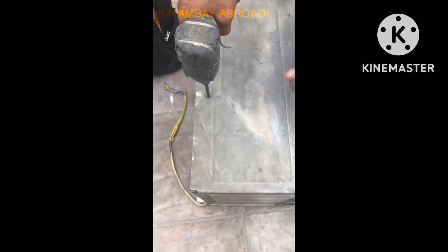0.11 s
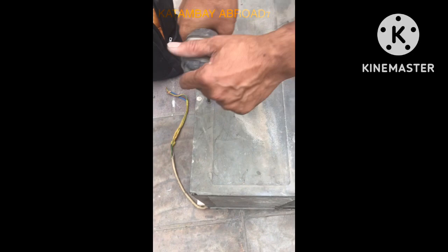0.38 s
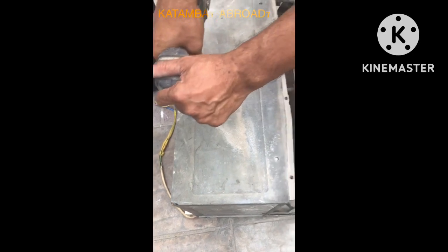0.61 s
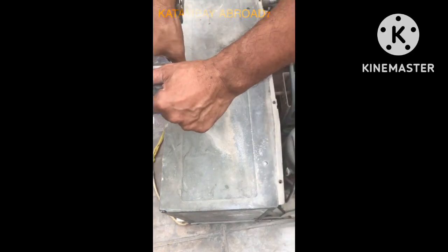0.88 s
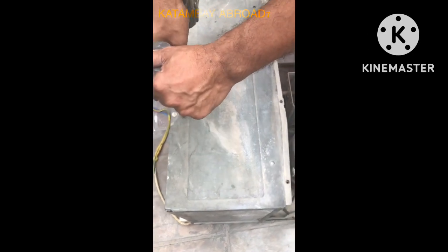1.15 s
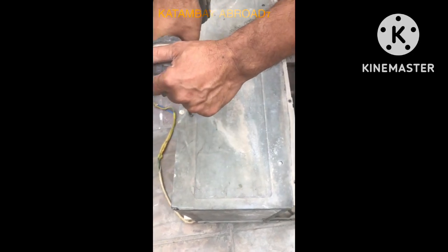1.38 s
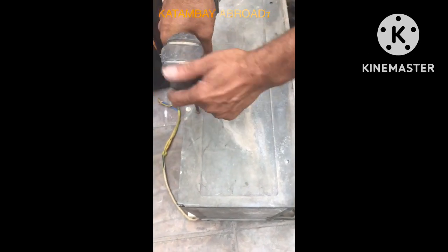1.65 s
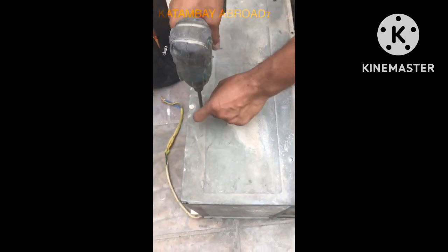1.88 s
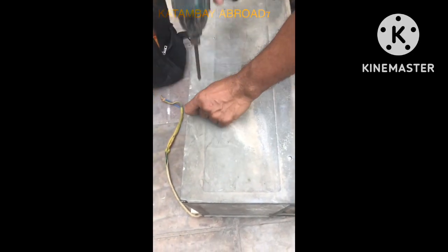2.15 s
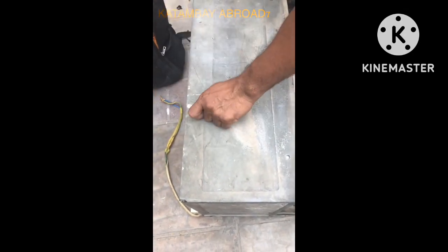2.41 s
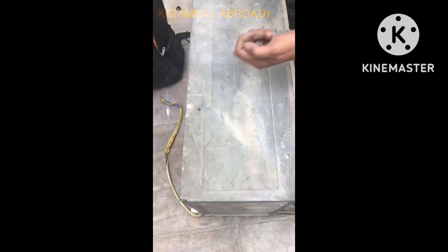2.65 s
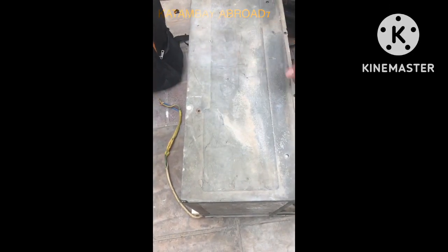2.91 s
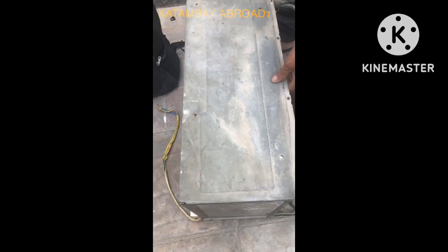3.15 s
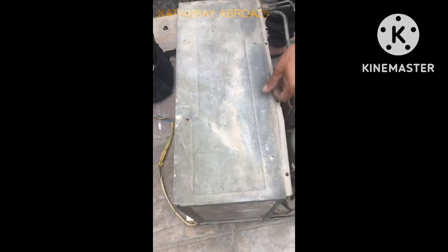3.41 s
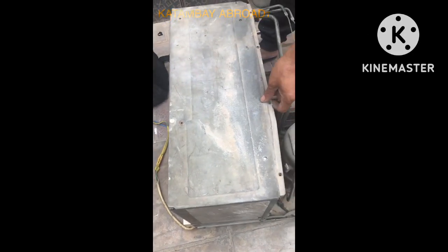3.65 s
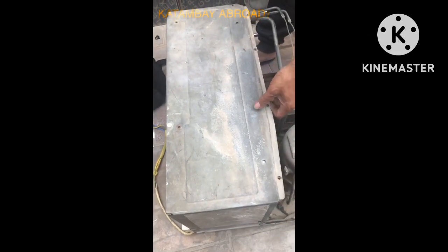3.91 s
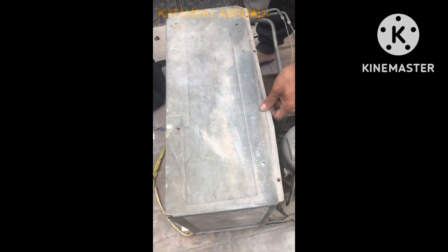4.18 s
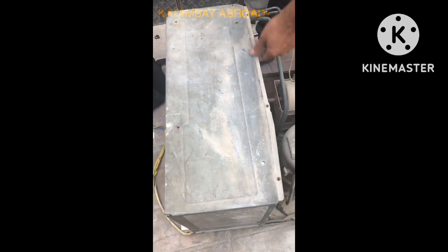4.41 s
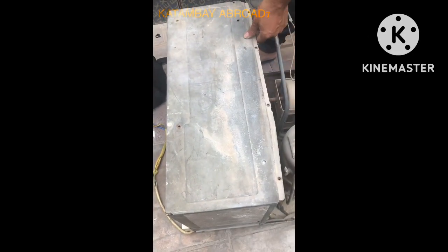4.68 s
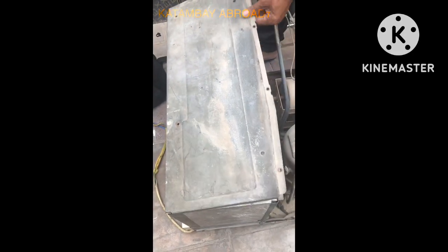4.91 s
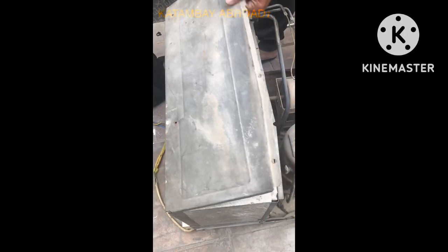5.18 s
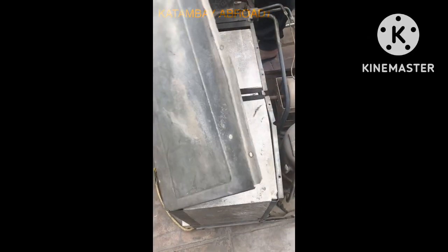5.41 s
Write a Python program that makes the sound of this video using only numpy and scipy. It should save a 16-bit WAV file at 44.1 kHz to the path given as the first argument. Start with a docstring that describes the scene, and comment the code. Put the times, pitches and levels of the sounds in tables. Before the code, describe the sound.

A cordless drill bites loudly into a screw, pauses, whirrs longer to unscrew it, then hands rub and tap a sheet-metal cover.

```python
"""Drill on a sheet-metal casing

A cordless drill bites into a screw, then runs again to unscrew it: the stick-slip judder booms in the panels,
while motor and gears whirr as coloured grit and swept tooth tones. Clicks of the drill body strike damped
modes, and a thin tone sings from the speed control. Hands rub, drag, tap and thump the cover as filtered
grains and modal blows, over an outdoor floor, a wavering hum and a rumble. Both channels carry the same sound.
"""
import sys
import numpy as np
from scipy import signal
from scipy.fft import rfft, irfft
from scipy.io import wavfile
from scipy.ndimage import uniform_filter1d

SR = 44100
rng = np.random.default_rng(int(sys.argv[2]) if len(sys.argv) > 2 else 0)


def to_wav(s):
    """Save 16-bit WAV."""
    ch = np.atleast_2d(s).T  # columns
    pcm = np.round(np.clip(ch, -1, 1) * 32767)  # PCM
    wavfile.write(sys.argv[1], SR, pcm.astype(np.int16))


def how_loud(loudness_db):
    """Turn decibels into a plain amplitude multiplier (0 dB gives 1, 20 dB gives 10)."""
    steps = np.asarray(loudness_db, float) / 20
    return 10 ** steps


N = 245047
T = np.arange(N) / SR


def level(x, db):
    """Energy normalisation: scale a signal to an rms level in dB."""
    return x * how_loud(db) / np.sqrt(np.mean(x ** 2))


def columns(table):
    """Linear interpolation: each column as a curve in time, with a gate open while the table lasts."""
    s, *cols = np.transpose(table)
    gate = uniform_filter1d(1. * ((T > s[0]) & (T < s[-1])), size=150)
    return gate, [np.interp(T, s, c) for c in cols]


def strokes(table, rise_db_per_s, fall_db_per_s, rest_db):
    """Exponential swell and decay: gain of gestures that rise, hold and fade, over a level at rest."""
    s, length, db = np.transpose(table)[:, :, None]
    rise = rise_db_per_s * np.maximum(s - T, 0)
    fall = fall_db_per_s * np.maximum(T - s - length, 0)
    return how_loud(rest_db) + how_loud(db - rise - fall).sum(axis=0)


def colour(x, points):
    """Minimum-phase filtering: a causal filter from (f/Hz, level/dB) points by way of the cepstrum."""
    hz, db = np.transpose(points)
    f = np.fft.rfftfreq(4096, 1 / SR)
    cep = irfft(np.log(how_loud(np.interp(np.log(f + 1), np.log(hz), db))))
    # folding the cepstrum onto positive time makes the response causal
    cep[1:2048] *= 2
    cep[2049:] = 0
    response = irfft(np.exp(rfft(cep)))
    return signal.fftconvolve(x, response)[:len(x)]


def band(x, hz, width):
    """Second-order resonance with gain 1 at its centre; width in Hz."""
    return signal.lfilter(*signal.iirpeak(min(hz, .45 * SR), hz / min(width, .45 * SR), SR), x)


def walk(rate):
    """Slow random modulation: levels held for 1 / rate s and slewed twice, with a spread near 1."""
    k = int(SR / rate)
    held = np.repeat(rng.standard_normal(N // k + 1), k)
    return 1.3 * uniform_filter1d(uniform_filter1d(held, k), k)[:N]


def grit(spread_db, size=N):
    """Contact of rough surfaces: dense tiny impacts of very uneven size."""
    return rng.standard_normal(size) * how_loud(spread_db * rng.exponential(size=size))


def ring(modes, t, centre_hz, favour_db):
    """Modal decay: clusters of twelve per mode, weakened by favour_db per octave off the centre; peak 1."""
    hz, db, t60 = np.repeat(np.transpose(modes), 12, axis=1)[:, :, None]
    luck = rng.standard_normal((2, len(hz), 1))
    db = db + 3 * luck[0] - favour_db * np.abs(np.log2(hz / centre_hz))
    spread_hz = hz * (1 + .07 * luck[1])
    y = (how_loud(db - 60 * t / t60) * np.sin(2 * np.pi * spread_hz * t)).sum(axis=0)
    return y / np.abs(y).max()


def blows(table, modes, ring_db, rise_s, linger, snap):
    """Forced modal vibration: each gritty scrape sounds by itself and keeps knocking the modes of the body."""
    out, t = np.zeros(N + SR), T[:SR // 4]
    for s, db, hz, decay, treble_db in table:
        # a linger above 1 holds the level before it dies
        fall = how_loud(-60 * (t / max(decay, .003)) ** linger)
        scrape = grit(2.0, size=len(t)) * fall * np.minimum(t / rise_s, 1)
        scrape = scrape * (1 + snap * np.exp(-t / 0.0031))
        body = band(band(scrape, hz, hz), hz, 2 * hz)
        treble = band(scrape, 7300, 12000)
        rung = signal.fftconvolve(scrape, ring(modes, t, hz, favour_db=6))[:len(t)]
        start = int(s * SR)
        for part, gain_db in ((body, 0), (treble, treble_db), (rung, ring_db)):
            out[start:start + len(t)] += how_loud(db + gain_db) * part / np.abs(part).max()
    return out[:N]


def yard():
    """Broadband noise and frequency modulation: a soft outdoor floor, a wavering hum and a deep rumble."""
    # spectrum of the floor: f/Hz, level/dB
    floor_colour = [(12, -25), (20, 5), (43, -8.5), (67, 12), (131, -10.5), (348, -3.5), (435, -39.5),
                    (954, -13), (1980, -26), (4980, -40), (6060, -58.5), (10300, -54), (12900, -36),
                    (16100, -43)]
    # the hum swells with the drill and the lifted cover: t/s, length/s, level/dB
    hum_swells = [(.6, 0.29, -40.5), (1.65, 0.064, -46.5), (4.98, .3, -48.5)]
    # the rumble swells with the drill and grows at the end: t/s, length/s, level/dB
    rumbles = [(.58, 0.034, -51), (5.1, 0.027, -48), (5.32, 0.26, -40)]
    fade_db_per_s = 122

    def deep_tone(hz):
        pitch = hz * (1 + .13 * walk(13))
        return level(how_loud(2.4 * walk(36)) * np.sin(2 * np.pi * np.cumsum(pitch) / SR), 0)

    hum = strokes(hum_swells, fade_db_per_s, fade_db_per_s, rest_db=-46) * deep_tone(57.2)
    rumble = strokes(rumbles, fade_db_per_s, fade_db_per_s, rest_db=-65.5) * deep_tone(37)
    floor = colour(rng.standard_normal(N), floor_colour) * how_loud(1.5 * walk(1.7))
    return level(floor, -50) + hum + rumble


def hands():
    """Sliding friction: skin rustles over the sheet in fine grains and drags it with a duller noise."""
    # spectra of rustle and drag: f/Hz, level/dB
    rustle_colour = [(410, -49), (700, -32), (747, -8.5), (985, -0.5), (1280, 0), (1900, -3), (3570, 3.5),
                     (4070, -1.5), (5800, -2), (12900, -4), (16100, -11.5)]
    drag_colour = [(53, -32), (90, 0), (201, 1), (317, -5), (385, -8), (568, -9), (638, -10.5),
                   (2000, -25.5), (2600, -30), (4400, -120)]
    # fingers rub the sheet: t/s, length/s, level/dB
    rubs = [(0, 0.034, -45), (.36, .03, -54.5), (1.2, 0.086, -52), (2.26, 0.053, -56), (2.45, 0.011, -54.5),
            (2.62, 0.094, -72), (3.13, 0.0094, -60.5), (3.26, .08, -47.5), (3.53, .06, -68.5),
            (3.65, 0.0033, -53), (4.24, 0.11, -47), (4.52, 0.022, -59.5), (4.68, .2, -56), (4.92, 0.2, -42),
            (5.16, .03, -46), (5.24, 0.054, -61.5)]
    # palms drag on the sheet: t/s, length/s, level/dB
    drags = [(0, 0.011, -29.5), (.1, 0.52, -51.5), (.9, .12, -44), (1.25, .02, -48), (2.03, 0.0061, -39),
             (2.74, 0.0083, -51), (3.26, 0.086, -48), (3.53, 0.0055, -48.5), (4.24, 0.0074, -53.5),
             (4.585, 0.08, -45), (4.72, 0.082, -45.5), (4.85, 0.099, -58)]
    rustle = level(colour(grit(1.5), rustle_colour) * how_loud(1.2 * walk(40)), 0)
    drag = level(colour(grit(2.0), drag_colour) * how_loud(2.5 * walk(20)), 0)
    rub_gain = strokes(rubs, rise_db_per_s=557, fall_db_per_s=381.5, rest_db=-65.5)
    drag_gain = strokes(drags, rise_db_per_s=256, fall_db_per_s=176.5, rest_db=-50)
    return rub_gain * rustle + drag_gain * drag


def clicks():
    """Impact excitation: clicks of trigger and chuck ring the damped modes of the drill body."""
    # clicks: t/s, level/dB (peak of the body part), bright centre f/Hz, decay/s, treble level/dB (relative)
    click_table = [(.1131, -16.5, 5240, 0.025, -10), (.176, -34.5, 3030, 0.01, -10),
                   (.2124, -47.5, 3000, 0.022, -6), (.3524, -29.5, 2990, 0.038, -23),
                   (.38, -41, 6030, .02, -6.5), (.4864, -38, 3018, 0.013, -12),
                   (.5136, -29, 3200, 0.017, -11), (.5232, -23.5, 2967, 0.018, -13.5),
                   (.5581, 2, 5720, 0.019, -9.5), (.5857, -8, 2993, 0.011, -6),
                   (.7096, -3.5, 4960, 0.022, -11.5), (.903, -37, 3460, 0.03, -10),
                   (.966, -35.5, 2870, 0.019, -26.5), (.9714, -22, 1270, 0.041, -29),
                   (.981, -26, 5000, 0.054, -7), (.9958, -20, 1455, 0.039, -5.5),
                   (1.0109, -5.5, 2800, 0.029, -6), (1.17, -24, 1270, 0.034, -13),
                   (1.1877, -28.5, 5040, 0.017, -3.5), (1.265, -20, 3236, 0.044, 5.5),
                   (1.2965, -0.5, 5636, 0.026, 3.5), (1.883, -9.5, 8910, 0.0033, -3),
                   (1.903, -10, 9390, 0.016, -9.5), (1.914, -32, 7820, 0.015, -8),
                   (2.1, -36.5, 6030, 0.02, -1)]
    # modes of the drill body: f/Hz, level/dB, t60/s
    drill_modes = [(1270, -13.5, 0.054), (1540, 8.5, 0.07), (2320, -16, .05), (2640, -10, 0.057),
                   (3270, 5.5, 0.061), (3920, -5.5, .045), (4290, 2, 0.033), (5180, -23.5, 0.03),
                   (6030, 2, 0.15), (5960, -7, .04), (9050, -20.5, .04), (10300, -13.5, 0.04),
                   (12200, -3, .03)]
    return blows(click_table, drill_modes, ring_db=-14, rise_s=0.00081, linger=0.98, snap=0.98)


def whine():
    """Amplitude modulation of a pure tone: the speed control sings while the trigger is half pulled."""
    # t/s, length/s, level/dB
    songs = [(.155, 0.014, -50), (.22, 0.12, -48.5), (.42, 0.06, -51.5)]
    tone_hz, fade_db_per_s = 8136, 348.5
    gain = strokes(songs, fade_db_per_s, fade_db_per_s, rest_db=-200)
    return gain * how_loud(2.5 * walk(40)) * np.sqrt(2) * np.sin(2 * np.pi * tone_hz * T)


def drill(table, whirr_colour, rough, chuck_hz, wobble_db, weak_db, dulling_per_s):
    """Stick-slip friction: each slip of the bit shakes the panels and stirs the whirr of motor and gears."""
    # judder rate of the bit, racing while it slips in the screw head: t/s, f/Hz
    judder = [(.6, 112), (.635, 141.3), (.7, 107.3), (1.3, 104.4)]
    # spectrum of the shaken panels: f/Hz, level/dB
    shake_colour = [(35, -77), (60, -9.5), (135, 2), (173, 3.5), (264, 2), (334, -2.5), (509, -8.5),
                    (577, -7), (695, -5), (935, -13), (1450, -15), (1690, -25.5), (2500, -28),
                    (3250, -50.5), (5500, -120)]
    # resonances of the drill housing: f/Hz, width/Hz, level/dB
    housing_bands = [(2598, 150, -1.5), (2800, 40, 1.5), (3565, 130, -2), (3870, 180, -8.5), (4420, 11, -5),
                     (5530, 510, -2), (5940, 60, -3), (7300, 51, -12.5), (8580, 83, -1.5),
                     (11300, 50, -6.5), (13980, 170, -18.5), (13200, 72, -9.5), (14700, 120, -15.5),
                     (16600, 170, -9)]
    gate, (whirr_db, shake_db) = columns(table)
    rate = np.interp(T, *np.transpose(judder))
    phase = np.cumsum(rate * (1 + .1 * rough * walk(90))) / SR
    # two slips a cycle, the second weaker
    slip_db = weak_db * (phase % 1 > .4) + 4 * rough * rng.standard_normal(N)
    slips = np.diff(np.floor(2 * phase), prepend=0) * how_loud(slip_db)
    # rough: power share of irregular grit against regular slips
    regular = level(colour(slips, shake_colour), 0)
    irregular = level(colour(grit(1.2), shake_colour), 0)
    shake = np.sqrt(1 - rough) * regular + np.sqrt(rough) * irregular
    teeth = grit(0.72) * (0.83 + np.exp(-(phase % 1) / 0.54))
    housing = sum(how_loud(db) * band(teeth, hz, width) / np.sqrt(width) for hz, width, db in housing_bands)
    whirr = level(level(colour(teeth, whirr_colour), 0) + level(housing, -11.0), 0)
    # the treble of the whirr thins out steadily as the run goes on
    whirr = whirr - np.clip(dulling_per_s * (T - table[0][0]), 0, .9) * band(whirr, 11000, 11000)
    # the chuck runs slightly out of true
    wobble = how_loud(wobble_db * np.sin(2 * np.pi * chuck_hz * T + .4 * walk(2.5)))
    return gate * (wobble * how_loud(shake_db) * shake + how_loud(whirr_db) * whirr)


def bite():
    """Stick-slip with fairly regular slips: a short grinding bite into the screw."""
    # t/s, motor whirr level/dB, casing shake level/dB
    course = [(.515, -58, -48.5), (.53, -37, -44.5), (.555, -26.5, -42.5), (.559, -14, -12.5),
              (.58, -20, -16), (.592, -9, -5.5), (.712, -14.5, -8.5), (.728, -25.5, -12.5),
              (.76, -34.5, -20.5), (.8, -50.5, -32.5), (.9, -68, -42)]
    # spectrum of the whirr: f/Hz, level/dB
    grind = [(590, -22.5), (1000, 1), (1310, -6.5), (1450, -4.5), (1690, -11.5), (3320, -9), (3680, -10.5),
             (7150, -15.5), (10300, -23.5), (13700, -13.5), (16100, -33)]
    return drill(course, grind, rough=.33, chuck_hz=25, wobble_db=1.6, weak_db=-11.5, dulling_per_s=0.15)


def unscrew():
    """Stick-slip with irregular slips: a longer unscrewing run with a bright whirr that dulls."""
    # t/s, motor whirr level/dB, casing shake level/dB
    course = [(1.268, -39.5, -28), (1.285, -26.5, -45), (1.3, -13, -29), (1.33, -19, -22),
              (1.4, -19.5, -28), (1.46, -20, -15), (1.6, -23, -23.5), (1.69, -24.5, -25),
              (1.73, -26, -30.5), (1.86, -25, -29), (1.915, -32.5, -30.5), (1.93, -56, -38.5),
              (1.97, -58.5, -51)]
    # spectrum of the whirr: f/Hz, level/dB
    bright_whirr = [(590, -26), (1000, -2.5), (1180, 6), (1710, -6.5), (3130, 3), (3990, 3.5), (4980, -1.5),
                    (6510, -1), (7060, -9), (8410, 1), (10400, -3.5), (12300, -3), (15100, -2.5),
                    (16100, -36.5)]
    return drill(course, bright_whirr, rough=.7, chuck_hz=8.8, wobble_db=1.24, weak_db=-14.5, dulling_per_s=0.69)


def thumps():
    """Low-order modal vibration: the whole cover thumps under the heavier touches, slow to build up."""
    # t/s, level/dB (before the slow build-up)
    touches = [(1.262, -22), (2.015, -24.5), (2.647, -23), (3.12, -26.5), (3.16, -37), (3.278, -37),
               (3.321, -28), (3.468, -22), (3.484, -18.5), (4.581, -30), (4.629, -30), (4.734, -17),
               (4.8, -37), (4.835, -40), (5.257, -32)]
    # low modes of the cover: f/Hz, level/dB, t60/s
    cover_modes = [(142, -10.5, 0.99), (198.4, -5.5, 0.87), (256, -7, 0.16), (306, -54, 0.19)]
    out, t = np.zeros(N + SR), T[:SR // 4]
    build_up = 1 - np.exp(-t / 0.0032)
    for s, db in touches:
        start = int(s * SR)
        out[start:start + len(t)] += how_loud(db) * build_up * ring(cover_modes, t, 195, 1.5)
    return out[:N]


def gears():
    """Gear meshing: tooth tones follow the motor; each shaft turn swings them and spreads side tones."""
    # gear train: t/s, tooth rate f/Hz, level/dB
    train = [(1.3, 1850, -50), (1.325, 1920, -28), (1.36, 2050, -26), (1.4, 2105, -27), (1.435, 2110, -28),
             (1.52, 1840, -28), (1.57, 1770, -32), (1.6, 2050, -31), (1.68, 1785, -32), (1.73, 1670, -33),
             (1.77, 1600, -55)]
    # tones of the train: multiple of the tooth rate, level/dB
    orders = [(.99, -6), (1.045, -5), (1.27, -10), (1.5, -8), (1.75, -9), (1.95, 0), (2.085, -4),
              (2.55, -9), (2.8, -11), (3.04, -4)]
    shaft_teeth, loose_s = 11, 1.48
    gate, (hz, db) = columns(train)
    shaft = 2 * np.pi * np.cumsum(hz / shaft_teeth) / SR
    teeth = 0
    for k, gain_db in orders:
        gain = how_loud(gain_db + 4 * walk(30))
        swing = .6 * np.sin(shaft + 2 * walk(20))
        jitter = 2 * np.pi * np.cumsum(k * hz * .003 * walk(120)) / SR
        teeth = teeth + gain * np.sin(k * shaft_teeth * shaft + swing + jitter)
    # the fourth multiple sings near top speed until the screw loosens
    fourth = how_loud(2.5 * walk(40)) * np.sin(4 * shaft_teeth * shaft)
    fourth_gain = (T < loose_s) * how_loud(-24 - .07 * (hz.max() - hz))
    return gate * (how_loud(db) * teeth + fourth_gain * fourth)


def taps():
    """Impact excitation of a plate: taps of the hands ring the modes of the sheet-metal casing."""
    # taps: t/s, level/dB (peak of the body part), bright centre f/Hz, decay/s, treble level/dB (relative)
    tap_table = [(2.013, -24, 710, 0.037, -22), (2.172, -25.5, 1900, 0.11, -4.5),
                 (2.292, -36, 1320, 0.143, -9), (2.647, -20.5, 820, 0.15, -5),
                 (2.726, -37.5, 12200, 0.011, 2), (3.044, -47.5, 6900, 0.0207, -23),
                 (3.114, -51, 1484, .06, -7), (3.162, -41, 1054, .06, -32.5),
                 (3.279, -21.5, 1100, 0.061, -5), (3.322, -16.5, 1090, 0.083, -3),
                 (3.359, -35, 1120, 0.075, -24.5), (3.468, -36.5, 780, 0.063, -27),
                 (3.482, -29, 2800, 0.062, 2.5), (3.67, -47, 9280, .02, -14.5),
                 (3.83, -40.5, 1760, .04, -2.5), (3.972, -41.5, 5830, 0.034, 6),
                 (4.507, -45.5, 3920, 0.21, 6), (4.577, -34.5, 1100, 0.055, -18.5),
                 (4.592, -31.5, 620, 0.037, -30), (4.622, -32, 620, 0.05, -14),
                 (4.656, -41.5, 1500, 0.088, -4), (4.729, -23.5, 3680, 0.054, -16),
                 (4.733, -26.5, 1200, 0.055, -30), (4.804, -34, 1440, 0.098, 3.5),
                 (4.835, -39.5, 8300, .05, 1), (5.258, -41.5, 3900, 0.045, -8)]
    # modes of the casing: f/Hz, level/dB, t60/s
    casing_modes = [(548, -23.5, 0.09), (673, 11, 0.12), (854, 7, 0.38), (1090, 4, 0.38), (1500, -13, 0.15),
                    (1900, -16, 0.15), (2330, 3, 0.15), (3010, 10.5, 0.18), (3546, 16.5, 0.022),
                    (4090, 13.5, 0.038), (4530, 21, 0.13), (5400, 15, 0.02), (6340, 22, 0.075),
                    (6900, -13, 0.038), (8600, 6, .04)]
    return blows(tap_table, casing_modes, ring_db=-5, rise_s=0.0017, linger=1.95, snap=0.87)


def scatter(hits):
    """Diffuse reflection: floor and walls return a short, decaying noise tail after each hit."""
    t = T[:SR // 4]
    tail = band(rng.standard_normal(len(t)), 2900, 4200) * how_loud(-60 * t / .16)
    return how_loud(-35.5) * signal.fftconvolve(hits, tail)[:N]


def scene():
    """Superposition: hits with their scatter, drill, hands and yard meet in one microphone."""
    hits = clicks() + taps() + thumps()
    hits = hits + scatter(hits)
    work = bite() + unscrew() + gears()
    mono = hits + work + whine() + hands() + yard()
    return np.array([mono, mono])


def low_pass(x):
    """Removes everything above the highest recorded frequency."""
    return signal.sosfilt(signal.butter(12, 16290, fs=SR, output="sos"), x)


def record(dry):
    """Port resonance and overload: the microphone port dips the treble; the loudest judder clips the input."""
    dipped = dry - .5 * band(dry, 10500, 640)
    return low_pass(np.clip(dipped, -1, 1))


dry = scene()
out = record(dry)
to_wav(out)
```